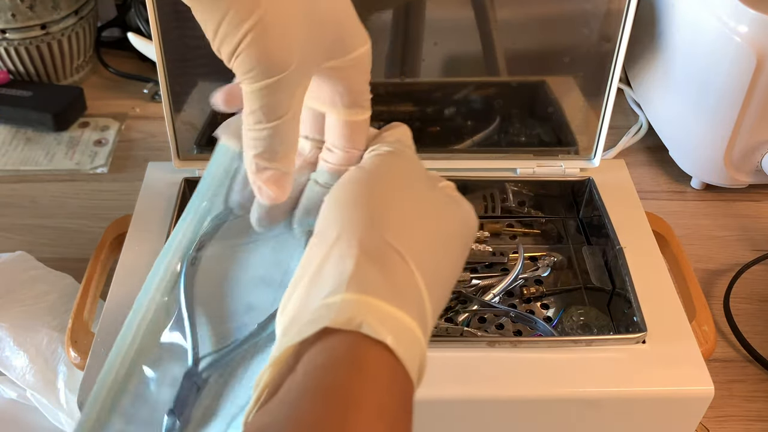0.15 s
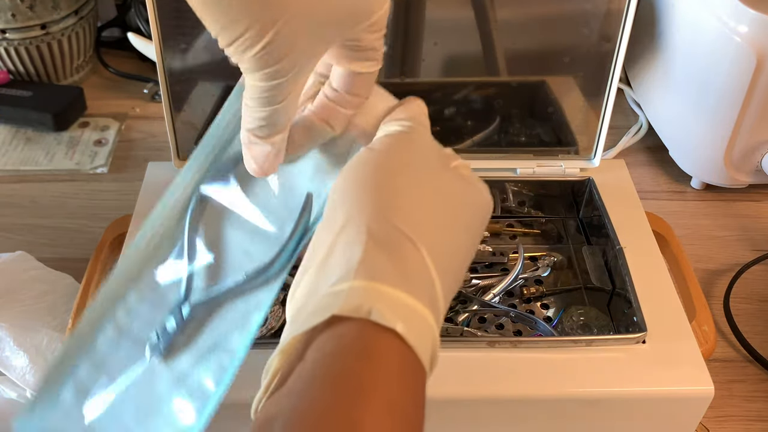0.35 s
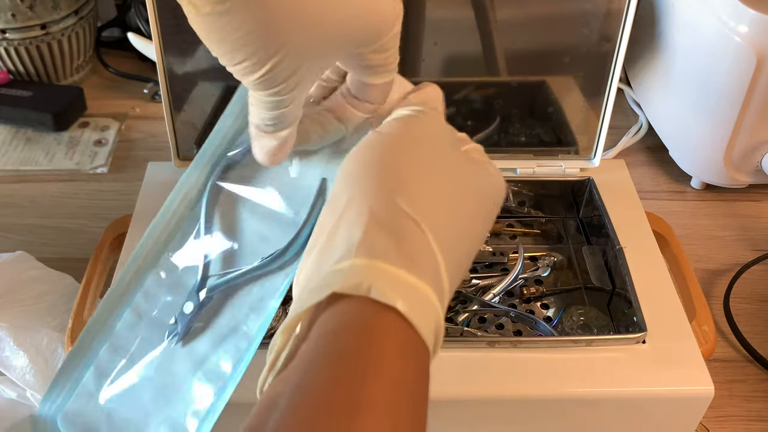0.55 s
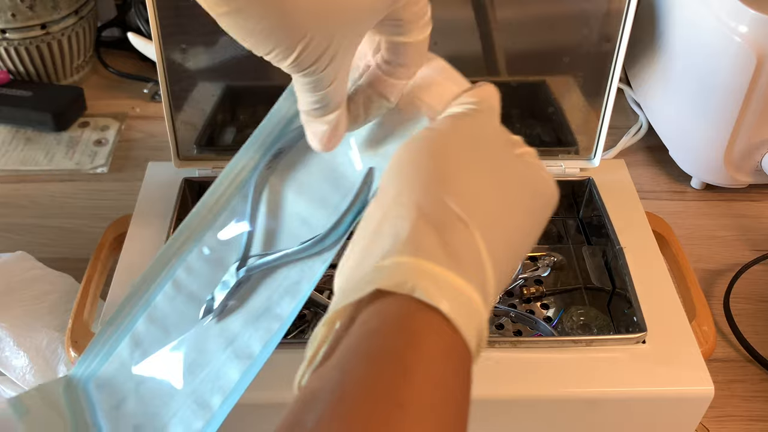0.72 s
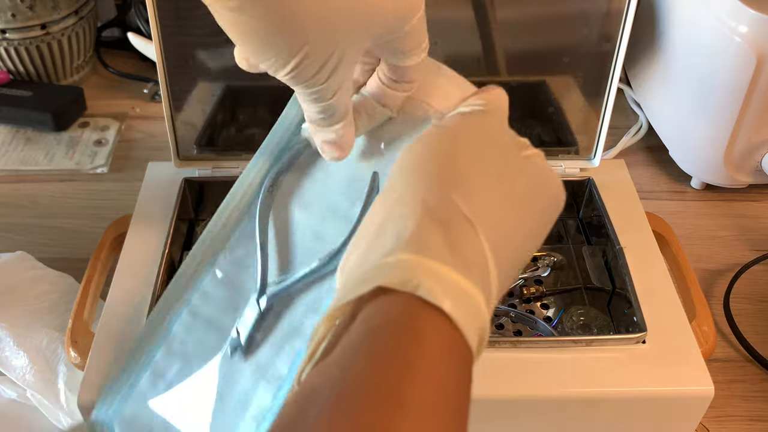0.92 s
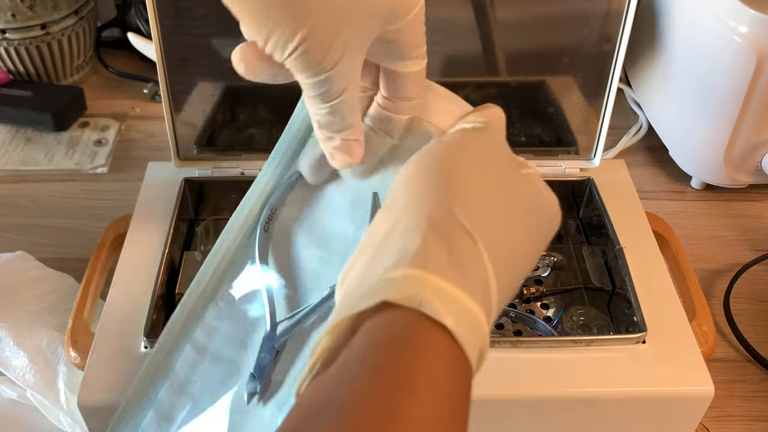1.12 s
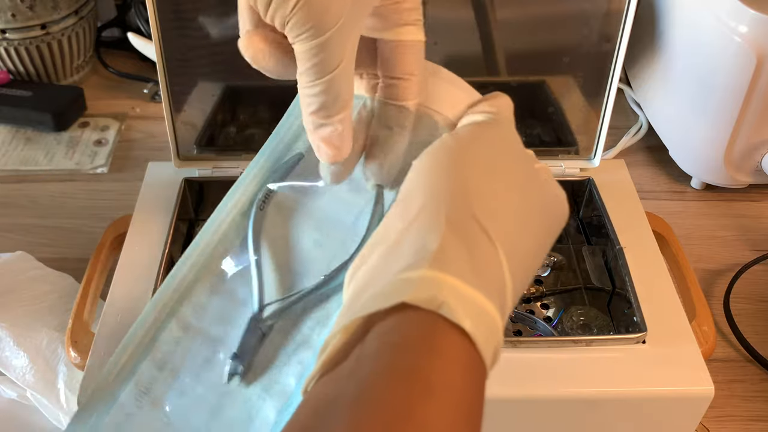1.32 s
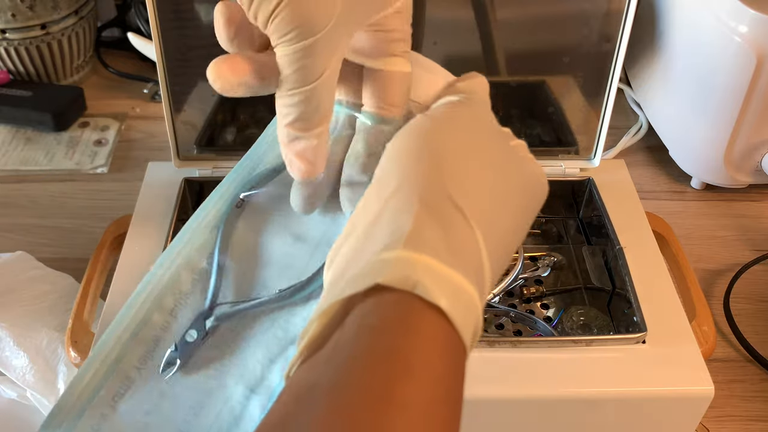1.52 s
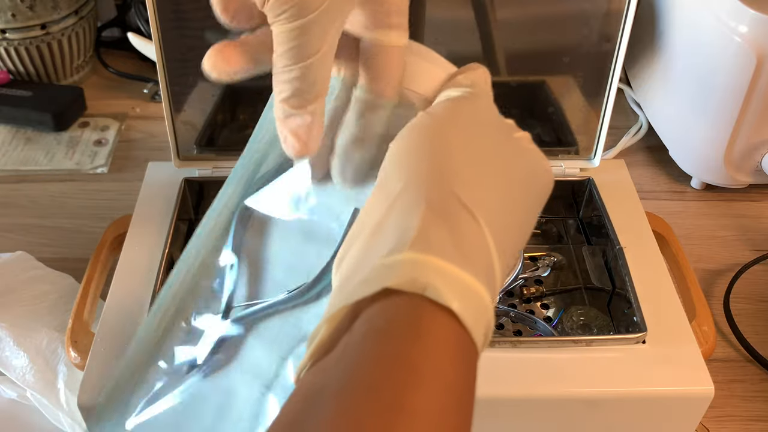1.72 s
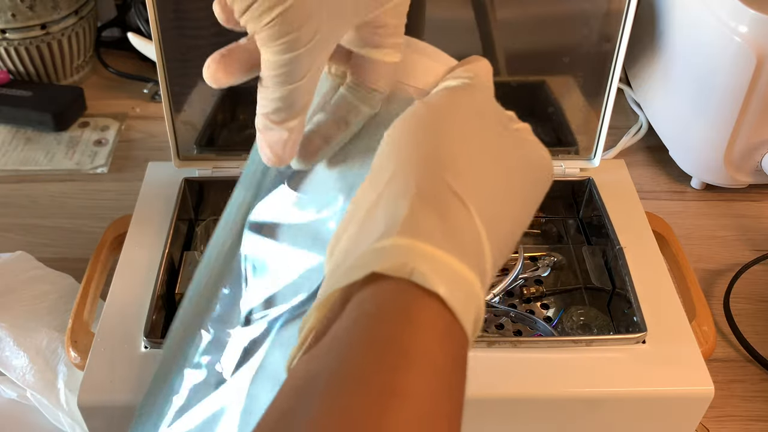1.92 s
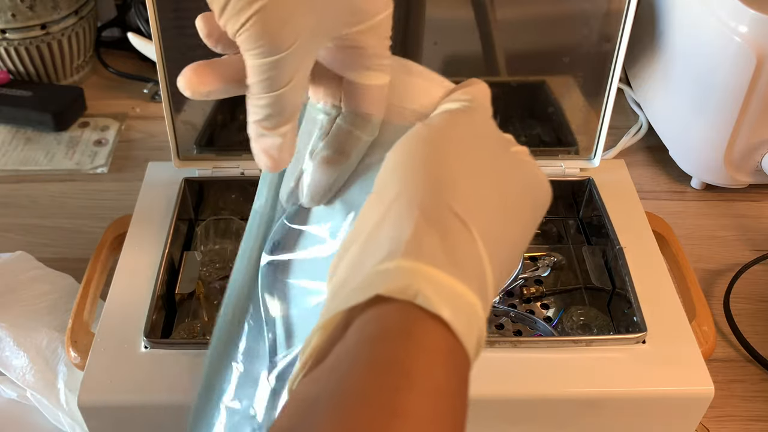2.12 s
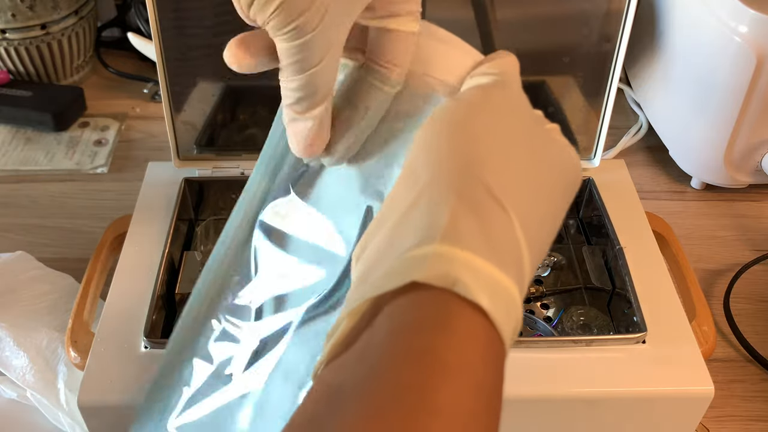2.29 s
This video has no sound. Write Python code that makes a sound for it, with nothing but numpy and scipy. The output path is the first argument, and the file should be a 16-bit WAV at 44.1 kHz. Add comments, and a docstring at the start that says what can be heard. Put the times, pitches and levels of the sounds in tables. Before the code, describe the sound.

Gloved hands flex a stiff film pouch: quick crackles come first, then stronger snaps in uneven clusters with short rustles between, heard close and fairly dry, with a faint low room rumble beneath.

```python
"""Paper and plastic pouch in gloved hands

Gloved hands work a pouch close to a pair of spaced microphones in a small room.
Snapping creases, tiny creaks and sliding film gate noise band by band into bright bursts and rustle.
Decaying noise gives the room tail; filtered noise gives a soft, slightly wavering rumble below."""
import sys
import numpy as np
from scipy import signal
from scipy.fft import rfft, irfft, next_fast_len
from scipy.io import wavfile

SR = 44100
rng = np.random.default_rng(int(sys.argv[2]) if len(sys.argv) > 2 else 0)


def wrap_up_sound(samples):
    """Save the sound to the file named by the first command line argument, as 16-bit audio."""
    columns = np.atleast_2d(samples).T
    # keep every value between -1 and 1, then stretch to whole-number steps
    tamed = np.clip(columns, -1, 1)
    steps = np.round(tamed * 32767).astype(np.int16)
    wavfile.write(sys.argv[1], SR, steps)


N = 103635

# centres of the thump, body, peak and sizzle of the pouch: [hz]
POUCH_BANDS_HZ = [450, 1500, 4500, 11000]


def from_db(db):
    """Decibels to amplitude."""
    return 10 ** (np.asarray(db) / 20)


def rms_one(x):
    """Scales a signal to an RMS of 1."""
    return x / np.sqrt(np.mean(x ** 2) + 1e-20)


def at_hz(points, hz, column=1):
    """Reads a table column at a frequency, linear in log frequency."""
    points = np.array(points)
    return np.interp(np.log(hz), np.log(points[:, 0]), points[:, column])


def drift(corner_hz):
    """Random wander of spread 1: noise through two equal low-pass poles, at 1/40 of the sample rate."""
    step = 40
    pole = np.exp(-2 * np.pi * corner_hz * step / SR)
    noise = rng.standard_normal(N // step + 2002)
    slow = signal.lfilter([1], [1, -2 * pole, pole * pole], noise)[2000:]  # drop the settling
    return np.interp(np.arange(N) / step, np.arange(len(slow)), rms_one(slow))


def dying(clicks, t60_s):
    """Each click becomes a step that decays exponentially."""
    return signal.lfilter([1], [1, -from_db(-60 / (t60_s * SR))], clicks + 1e-18)


def bands(low_hz, count):
    """Third-octave band centres and filters."""
    edges_hz = low_hz * 2 ** (np.arange(count + 1) / 3)
    return [(np.sqrt(a * b), signal.butter(2, [a, b], "band", fs=SR, output="sos"))
            for a, b in zip(edges_hz, edges_hz[1:])]


def pair(white, alike):
    """Left and right share one noise and add one of their own; alike is the shared power."""
    alike = np.clip(alike, 0, 1)
    return np.sqrt(alike) * white[0] + np.sqrt(1 - alike) * white[1:]


def left_right(difference_db):
    """Gains that split a left minus right level difference evenly."""
    return from_db(difference_db / 2 * np.array([[1], [-1]]))


def resonate(x, peaks):
    """Adds two-pole resonances on top of a sound."""
    out = x
    for hz, width_hz, db in peaks:
        r = np.exp(-np.pi * width_hz / SR)
        zeros = [(1 - r * r) / 2, 0, (r * r - 1) / 2]
        poles = [1, -2 * r * np.cos(2 * np.pi * hz / SR), r * r]
        out = out + from_db(db) * signal.lfilter(zeros, poles, x)
    return out


def rumble():
    """Soft room noise, strongest in the bass: each band wavers and the low bands excite room resonances."""
    # colour: [hz, relative_db]
    rumble_colour = [(25, -13), (45, -7), (62, 1), (266, -5.5), (400, -6.5), (750, -18.5), (1550, -18.5),
                     (3000, -21)]
    # left-right likeness: [hz, shared_power_0_to_1]
    rumble_alike = [(100, 0.95), (400, 0.96), (900, 0.023)]
    # room resonances: [hz, width_hz, added_db]
    room_tones = [(76.4, 10.2, 6), (97.1, 8.7, 7.5), (146.5, 52, 2), (351.4, 57, 1.5)]
    level_db, left_minus_right_db = -44.5, 0.4
    waver_db, waver_hz = 2.5, 3.36

    white, out = rng.standard_normal((2, 3, N + SR)), 0
    for k, (hz, sos) in enumerate(bands(22, count=22)):
        noise = signal.sosfilt(sos, pair(white[k % 2], at_hz(rumble_alike, hz)))
        noise = resonate(noise, room_tones if hz < 600 else [])
        gain = from_db(at_hz(rumble_colour, hz) + waver_db * drift(waver_hz))
        out = out + gain * noise[:, SR:]  # drop the settling
    return from_db(level_db) * left_right(left_minus_right_db) * rms_one(out)


def room(x):
    """A dull diffuse tail: convolution with low-passed decaying noise, different on each side."""
    t60_s, tail_db, cut_hz, gap_s = 0.19, -14, 3200, 0.004
    t = np.arange(SR // 2) / SR
    tail = rng.standard_normal((2, len(t))) * from_db(-60 * t / t60_s) * (t > gap_s)
    tail = signal.sosfilt(signal.butter(1, cut_hz, fs=SR, output="sos"), tail)
    return from_db(tail_db) * signal.fftconvolve(x, tail / np.linalg.norm(tail[0]), axes=1)[:, :N]


def handling_rustle(centres_hz):
    """Handling drives rustle amplitude per band; treble swings more than body, crumpling fills the bass."""
    # handling: [time_s, body_drive_db, low_crumple_drive_db]
    handling = [(0, -51.5, -51.5), (.2, -54.5, -55), (.31, -56, -60), (.5, -56, -51), (.73, -60, -57),
                (0.779, -52, -56), (.96, -51.5, -45.5), (1.049, -49.5, -37.5), (1.11, -58.5, -61),
                (1.3, -61, -52), (1.4, -51.5, -51), (1.48, -49, -48), (1.62, -61, -52.5), (1.76, -53, -60),
                (1.92, -53.5, -67), (2.13, -62, -67), (2.2, -58.5, -62), (2.35, -64.5, -57)]
    treble_db, treble_swing, usual_body_db = -60.5, 1.27, -56.5

    when_s, *columns = np.transpose(handling)
    body_db, low_db = [np.interp(np.arange(N) / SR, when_s, c) for c in columns]
    high_db = treble_db + treble_swing * (body_db - usual_body_db)
    rustle = []
    for hz in centres_hz:
        high = np.interp(np.log(hz), np.log(POUCH_BANDS_HZ[2:]), [0, 1])
        low = np.interp(np.log(hz), np.log(POUCH_BANDS_HZ[:2]), [1, 0])
        rustle.append(from_db((1 - high - low) * body_db + high * high_db + low * low_db))
    return rustle


def film_creaks(centres_hz):
    """Tiny creaks at random instants, each with its own strength and smooth tilt across the bands."""
    rate_per_s, base_db, spread_db, colour_db = 180, -3, 3.5, 4
    strength_db = base_db + spread_db * np.minimum(rng.exponential(1, N), 4)
    born = rng.random(N) < rate_per_s / SR
    tilt = rng.standard_normal((2, N))
    creaks = []
    for k in range(len(centres_hz)):
        tilt_db = colour_db * (np.cos(k / 4) * tilt[0] + np.sin(k / 4) * tilt[1])
        creaks.append(born * from_db(strength_db + tilt_db))
    return creaks


def crease_snaps(centres_hz):
    """Creases snap over as one click per band, low bands early so that all bands peak together."""
    # snaps: [peak_time_s, drive_db, thump_rel_db, body_rel_db, sizzle_rel_db], the last three re drive_db
    snaps = [(0.0448,-28,-4,-13.5,-6), (0.0852,-24.5,-61,-3,-12), (0.1344,-30,-17,-9.5,-3.5),
             (0.1795,-26,-19,-15.5,-16.5), (0.2207,-30,-7,-2,-37), (0.2386,-22,-16,-10,-10),
             (0.2442,-19,-21,-9,-7), (0.3429,-42.5,5.5,3,-8), (0.3584,-12,-54,-14.5,-2),
             (0.3744,-13,-39,-8.5,3), (0.38,-18.5,-20,-2.5,-23), (0.4,-27,-39,-12,3),
             (0.404,-19.5,-21,-8,-30), (0.408,-23,-34,-7.5,-36), (0.5532,-21.5,-15.5,-13.5,-3.5),
             (0.6604,-40,-18,5.5,-10), (0.797,-49,17,9.5,-20), (0.8253,-61,-30,-37,3),
             (0.8459,-26,-20.5,1.5,-5.5), (0.8777,-26,-58,-14,-12), (0.9274,-24,-30,-2,-9.5),
             (0.9277,-13.5,-17,-18,-16), (1.044,-48,-15,-5,-16), (1.062,-37.5,-21,-3,-46),
             (1.1444,-12,-16.5,-8,-5.5), (1.158,-20,-10,-7.5,-5), (1.2061,-19,-13.5,-8.5,-4),
             (1.2125,-24,-18,-3,-12), (1.4152,-27.5,-10,-10,-5.5), (1.456,-24,-8,-10.5,-11),
             (1.471,-28.5,-10.5,-18,-6), (1.487,-25.5,-12,-24,2.5), (1.507,-33.5,-39,0,-27),
             (1.5745,-44,4.5,8,-20), (1.5809,-27,-3.5,-2,-23), (1.6928,-26.5,-12,-6,-16),
             (1.714,-19,-17,-10.5,-13.5), (1.7412,-22,-15.5,-20,-1.5), (1.7885,-27.5,-18,-11,4),
             (1.7991,-22.5,-18,3,-22), (1.8588,-35,-5,-8,-42), (1.9458,-40.5,2,-5.5,-7),
             (1.987,-14.5,-16,-18.5,-23), (2.1723,-32,-28,-20,-25), (2.188,-42,-20,-5,6.5),
             (2.229,-37,-10,-2,-11), (2.2465,-39.5,13.5,4,-31), (2.285,-23.5,-26,-32,-12.5)]
    # added drive of the thump, body, peak and sizzle bands: [db]
    lift_db = [9.5, 6.5, -3, 2.5]
    colour_db, lead_cycles = 2, 0.59

    rows = np.array(snaps)
    relative_db = np.c_[rows[:, 2:4], 0 * rows[:, 0], rows[:, 4]]
    levels_db = rows[:, 1:2] + relative_db + lift_db
    colour = rng.standard_normal((len(rows), len(centres_hz)))  # each crease favours bands of its own
    clicks = np.zeros((len(centres_hz), N))
    for k, hz in enumerate(centres_hz):
        start = ((rows[:, 0] - lead_cycles / hz) * SR).astype(int)
        band_db = np.array([np.interp(np.log(hz), np.log(POUCH_BANDS_HZ), db) for db in levels_db])
        clicks[k, start] = from_db(band_db + colour_db * colour[:, k])
    return clicks


def delay_right(x):
    """Delays the right microphone by about eight samples (0.18 ms) through a phase ramp."""
    lag_s, size = 0.0001771, next_fast_len(N + 64)
    shift = np.exp(-2j * np.pi * np.fft.rfftfreq(size, 1 / SR) * lag_s)
    x[1] = irfft(rfft(x[1], size) * shift, size)[:N]
    return x


def pouch():
    """Snaps, creaks, gritty flutter and sliding film gate noise per band; hollows ring along."""
    # colour of film and paper: [hz, gain_db]
    film_colour = [(250, -1), (600, -1), (1000, -5), (1500, -0.4), (2100, -2), (3300, 2), (4800, -3),
                   (7000, 0), (10500, 1.5), (13000, -8), (16000, -5.5)]
    # microphones: [hz, shared_power_0_to_1, left_minus_right_db]
    microphones = [(312, 1, 0), (724, 0.86, 3.5), (1460, 0.79, 3.5), (3020, 0.65, -0.5), (4940, 0.42, -2),
                   (6070, 0.23, -6), (7400, 1, 1), (14700, 0.93, 0)]
    # decay of snaps and creaks: [hz, t60_s]
    snap_decay = [(300, 0.014), (1500, 0.017), (4500, 0.0098), (12000, 0.0064)]
    # first clean blow of a snap: [hz, gain_db]
    knock = [(300, 15.5), (900, 17), (2500, 1)]
    # resonances of pouch and tray: [hz, width_hz, added_db]
    hollows = [(345, 79, -3.5), (1190, 36, -3), (1310, 29, -1), (1545, 66, 1.5), (4146, 610, -8)]
    rise_s = 0.00019
    flutter_db, flutter_t60_s, chatter_db = -21.5, 0.13, -24
    grit_db, grit_hz = 3, 61
    slide_db, slide_patchy_db, slide_patch_hz = -0.3, 3.5, 18

    filters = bands(200, count=19)
    centres_hz = [hz for hz, _ in filters]
    layers = zip(handling_rustle(centres_hz), film_creaks(centres_hz), crease_snaps(centres_hz))
    grit = from_db(grit_db * drift(grit_hz))
    rise = np.exp(-1 / (rise_s * SR))
    white, out = rng.standard_normal((2, 3, N)), 0
    for k, ((hz, sos), (rustle, creaks, clicks)) in enumerate(zip(filters, layers)):
        flutter = dying(clicks, flutter_t60_s)
        # a snap sets off creaks while it flutters
        creak_clicks = (rustle + from_db(chatter_db) * flutter) * creaks
        burst = dying(clicks + creak_clicks, at_hz(snap_decay, hz))
        burst = burst + from_db(flutter_db) * flutter * grit
        gate = signal.lfilter([(1 - rise) ** 2], [1, -2 * rise, rise ** 2], burst)
        # rubbing film comes and goes band by band
        gate = gate + from_db(slide_db + slide_patchy_db * drift(slide_patch_hz)) * rustle
        noise = gate * pair(white[k % 2], at_hz(microphones, hz))
        blow = from_db(at_hz(knock, hz)) * clicks
        side = left_right(at_hz(microphones, hz, column=2))
        out = out + from_db(at_hz(film_colour, hz)) * side * signal.sosfilt(sos, noise + blow)
    return 2 * resonate(delay_right(out), hollows)


def scene():
    """Pouch, its room tail and the rumble."""
    near = pouch()
    return near + room(near) + rumble()


def record(dry):
    """A steep low-pass cuts the top."""
    cutoff_hz = 17000
    return signal.sosfilt(signal.cheby2(14, 60, cutoff_hz, fs=SR, output="sos"), dry)


dry = scene()
out = record(dry)
wrap_up_sound(out)
```